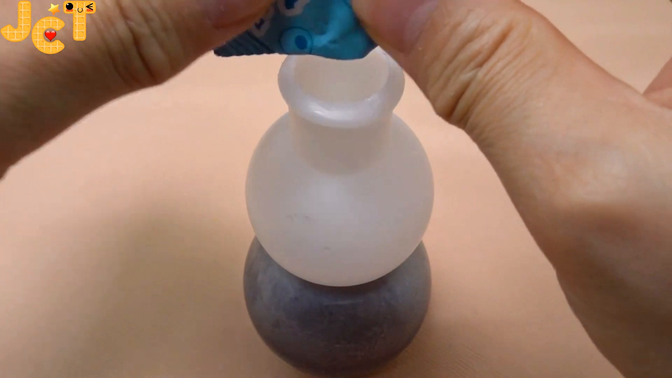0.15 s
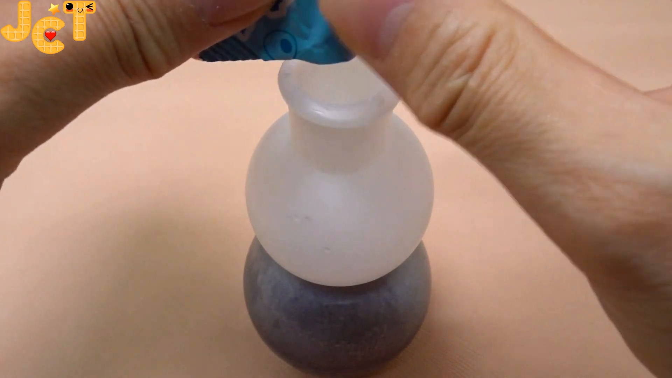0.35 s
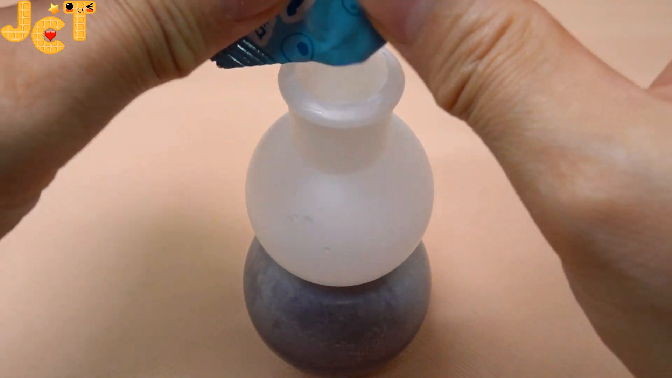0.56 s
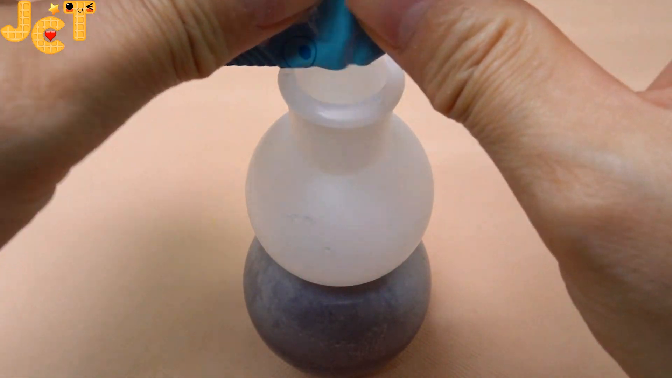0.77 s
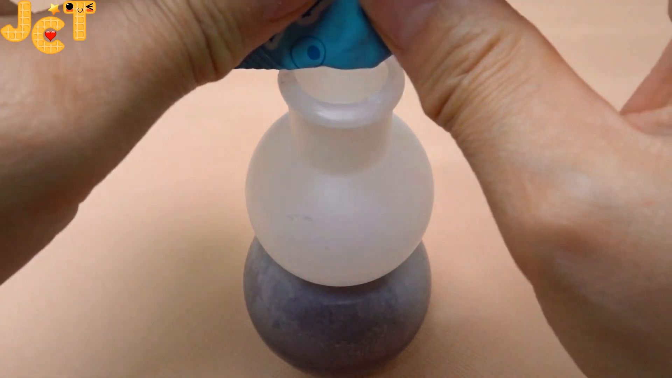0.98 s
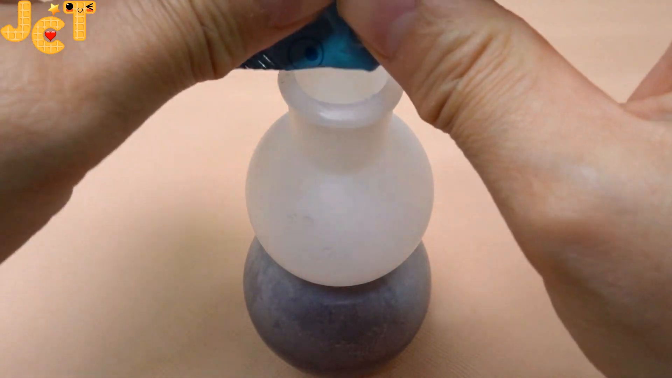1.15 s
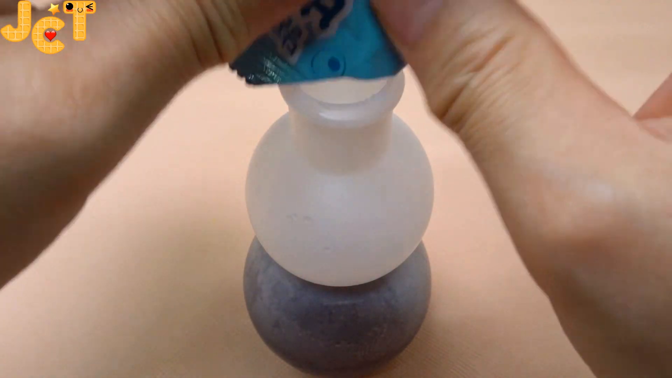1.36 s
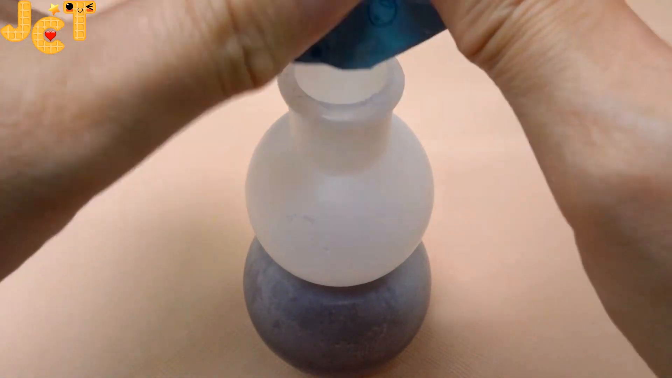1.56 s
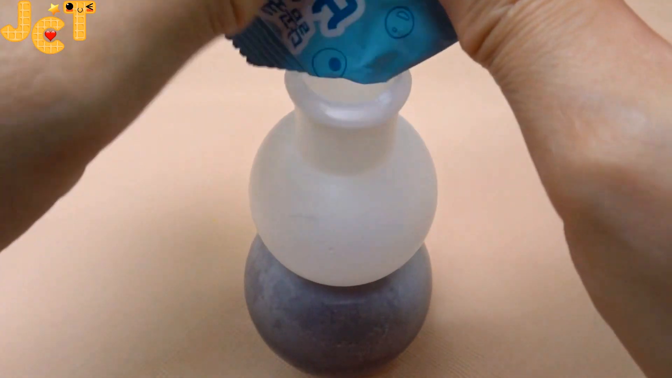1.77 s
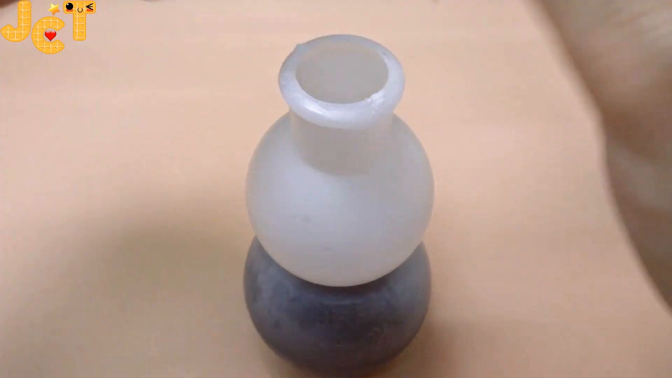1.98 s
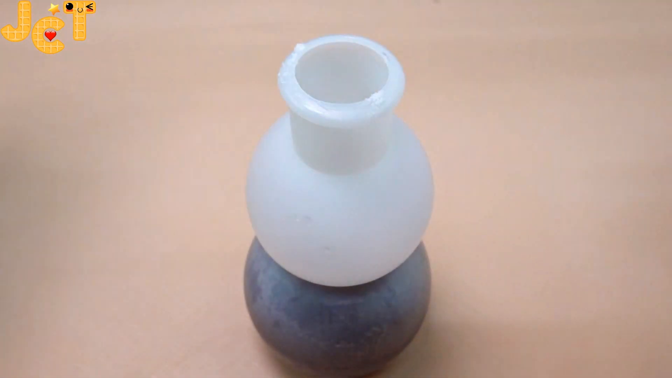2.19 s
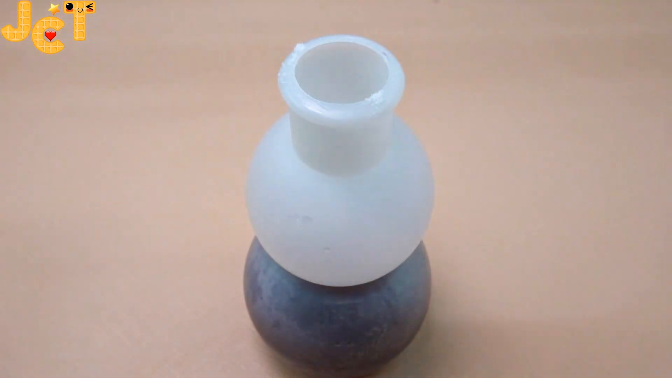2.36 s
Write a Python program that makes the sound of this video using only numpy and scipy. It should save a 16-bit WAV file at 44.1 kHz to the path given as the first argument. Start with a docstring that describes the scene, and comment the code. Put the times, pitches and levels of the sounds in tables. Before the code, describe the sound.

A plastic sachet crinkles in bright, irregular snaps over fine crackle, while small bursts of grains and dull bumps ring a little plastic flask; it thins to a few ticks. Close stereo microphone, quiet small room.

```python
"""Creases snap in the film of a plastic sachet, squeezed and shaken over a small plastic flask, over finer crackle.
Each snap is a sharp crack with a short scatter, coloured by a ringing patch of film; a few panels pop with a pitch.
Candy grains, clumps of powder and dull bumps strike the flask and ring its fading modes; fingers rub in dull pulses.
The sachet is lifted away, leaving a few last ticks. Filtered noise makes the still air and faint tail of the room."""
import sys
import numpy as np
from scipy import signal
from scipy.fft import rfft, irfft
from scipy.io import wavfile

SR = 44100
rng = np.random.default_rng(int(sys.argv[2]) if len(sys.argv) > 2 else 0)


def inscribe(sig):
    """Save sig as 16-bit PCM at rate SR to the path in sys.argv[1].

    A 1-D sig is mono; a 2-D sig holds one channel per row.
    Samples are clipped to [-1, 1] before scaling.
    """
    pcm = np.round(np.clip(np.atleast_2d(sig).T, -1, 1) * 32767)
    wavfile.write(sys.argv[1], SR, pcm.astype(np.int16))


N = 105840  # length of the scene [samples]
TOP_HZ = 16100  # upper limit of the sound
SNAP_WINDOW_S = .005  # the level of any short sound is taken over this time


def undb(db):
    """Turn decibels into gain."""
    return 10 ** (np.asarray(db) / 20)


def unit(x):
    """Scale to an energy of one per channel, averaged over the channels."""
    channels = len(np.atleast_2d(x))
    return x / np.sqrt(np.sum(x ** 2) / channels + 1e-20)


def steady(x):
    """Scale a sound that lasts the whole scene to an average strength (rms) of one."""
    return unit(x) * np.sqrt(N)


def blow(x, db):
    """Set the level of a short sound, taken over the length of a snap."""
    return undb(db) * unit(x) * np.sqrt(SNAP_WINDOW_S * SR)


def curve(points):
    """Gain over time, drawn as straight lines in dB between (time [s], level [dB]) points."""
    times, levels = np.array(points).T
    return undb(np.interp(np.arange(N) / SR, times, levels))


def freqs(size=1024):
    """Frequencies [Hz] in the spectrum of a short response."""
    return np.fft.rfftfreq(size, 1 / SR)


def slope(points, f):
    """Levels in dB at frequencies f, joined on a log frequency axis."""
    hz, db = np.array(points).T
    return np.interp(np.log(f + 1), np.log(hz), db)


def causal(db):
    """Response with this spectrum in dB that starts at once and is as short as possible."""
    cepstrum = irfft(np.log(undb(db)))
    half = len(cepstrum) // 2
    # folding the second half onto the first keeps everything after time zero
    cepstrum[1:half] *= 2
    cepstrum[half + 1:] = 0
    return irfft(np.exp(rfft(cepstrum)))


def through(x, h):
    """Pass a sound through a response, keeping its length."""
    full = signal.fftconvolve(np.atleast_2d(x), np.atleast_2d(h), axes=1)
    return full[:, :np.shape(x)[-1]]


def band(x, low_hz, high_hz, order=3):
    """Keep only the frequencies between two limits."""
    sos = signal.butter(order, [low_hz, high_hz], "band", fs=SR, output="sos")
    return signal.sosfilt(sos, x)


def add(out, start, x):
    """Mix x into out at a start time [s]."""
    i = max(int(start * SR), 0)
    out[:, i:i + x.shape[-1]] += x[..., :N - i]


WIDE_HZ, SIDE_SHARE, SIDE_BASS = 8000, .52, .12  # the side share grows from SIDE_BASS towards the treble


def widen(mid, side):
    """Two ears that are alike in the bass and differ in the treble."""
    f = freqs(len(mid))
    share = SIDE_BASS + SIDE_SHARE * f / np.hypot(f, WIDE_HZ)
    side = irfft(rfft(side) * share, len(mid))
    return mid + np.array([side, -side])


def stereo_noise(size):
    """Noise spread between the ears."""
    return widen(*rng.standard_normal((2, size)))


def grains(per_s, spread_db):
    """Impulses of uneven size and random sign at random times, rms one."""
    size = undb(spread_db * np.clip(rng.standard_normal(N), -2, 2)) * rng.choice([-1, 1], N)
    hit = rng.random(N) < per_s / SR
    return steady(size * hit)


# tone of the still air: (frequency [Hz], level [dB])
AIR = [(25, 7.5), (70, -6.5), (140, 4.5), (300, -0.5), (500, -4.5), (1200, -8), (3000, -7.5), (7700, -10.5),
       (16000, -16)]
AIR_DB = -62.5  # rms level


def still_air():
    """The quiet hiss and rumble of the air: steady noise shaped by its tone."""
    response = causal(slope(AIR, freqs(size=4096)))
    return undb(AIR_DB) * steady(through(stereo_noise(N), response))


ROOM_DB, ROOM_T60_S = -30, 0.76  # T60: time to fade by 60 dB


def room(size=32768):
    """Faint, dull tail of a small room: noise that swells briefly, then fades evenly in dB."""
    t = np.arange(size) / SR
    swell = np.clip(t / 0.031, 0, 1) ** 2
    tail = stereo_noise(size) * np.exp(-np.log(1000) * t / ROOM_T60_S) * swell
    return undb(ROOM_DB) * unit(band(tail, low_hz=120, high_hz=8200, order=1))


# dull rubbing of fingers on the sachet: (time [s], level [dB])
RUB = [(0, -54), (.2, -70), (.29, -50.5), (.37, -57), (.43, -72), (.54, -56), (.98, -70.5), (1.06, -56),
       (1.2, -67.5), (1.66, -58.5), (2.3, -68)]


def rubbing():
    """Fingertips stick and slip on the sachet: dull, uneven pulses."""
    slips = grains(per_s=320, spread_db=3)
    dull = band(slips, low_hz=128, high_hz=630) + band(slips, low_hz=51.3, high_hz=124)
    return curve(RUB) * steady(dull)


FLASK_DETUNE, FLASK_SPREAD_DB = .008, 3  # random spread of pitch (as a fraction) and level from blow to blow
# what the flask rings with, before that spread: (frequency [Hz], level [dB], time to fade by 60 dB [s])
FLASK = [(882, 0, .085), (955, -7, .035), (1560, -14, .025), (2680, -16, .025), (4230, -13, .02),
         (4960, -16, .02)]


def flask(size=4096):
    """Response of the flask to one blow: the air in its neck, and wall modes that depend on the spot hit."""
    t = np.arange(size) / SR
    hz, db, t60 = np.array(FLASK).T[:, :, None]
    detune, weight = rng.standard_normal((2, len(FLASK), 1))
    modes = np.sin(2 * np.pi * hz * (1 + FLASK_DETUNE * detune) * t) * np.exp(-np.log(1000) * t / t60)
    # dividing by sqrt(t60) keeps long-lived modes from gaining energy just by lasting
    gains = undb(db + FLASK_SPREAD_DB * weight) / np.sqrt(t60)
    return unit(band(np.sum(gains * modes, axis=0), low_hz=397, high_hz=12000))


GRAINS_PER_S = 400
# flow of grains into the flask: (time [s], level [dB])
POUR = [(0, -55), (.15, -72.5), (.33, -51.5), (.44, -80), (.58, -83), (1.1, -64), (1.48, -83),
        (1.55, -51.5), (1.66, -51), (1.74, -55.5), (1.81, -86), (1.98, -53.5), (2.15, -76)]
# clumps of powder landing in the flask: (time [s], level [dB])
CLUMPS = [(.5118, -35.5), (.555, -45), (1.541, -42), (1.642, -30), (1.653, -32.5), (1.688, -41.5),
          (2.042, -47), (2.1255, -51.5)]


def powder(spots=6):
    """Single grains land on several spots of the flask; now and then a clump drops at once."""
    out = np.zeros((1, N))
    for _ in range(spots):
        hits = curve(POUR) * grains(GRAINS_PER_S / spots, spread_db=2.5)
        out += through(hits, flask()) / np.sqrt(spots)
    for start, db in CLUMPS:
        add(out, start, blow(flask(), db))
    return out


REBOUND_S, REBOUND_DB = .0035, -9  # shortest delay of the rebound, and its level against the knock
BUMP_RING_DB = -8  # ring of the flask against the knock
# the sachet bumps the flask: (time [s], level [dB], lowest and highest frequency of the knock [Hz])
BUMPS = [(0.0603, -39.5, 246, 476), (0.0682, -47, 131, 920), (0.2196, -39, 137, 500),
         (.5088, -38.5, 307, 374), (.8605, -47, 610, 746), (1.6941, -36, 260, 566),
         (1.7738, -45.5, 440, 895), (2.0705, -45, 280, 600), (2.0755, -40, 660, 885),
         (2.089, -37.5, 213, 420)]


def bumps(size=2048):
    """Short, dull knocks with an uneven rebound; they also ring the flask."""
    out = np.zeros((1, N))
    for start, db, low_hz, high_hz in BUMPS:
        knock = band(signal.unit_impulse(size), low_hz, high_hz, order=2)
        add(out, start, blow(knock, db))
        add(out, start + REBOUND_S * rng.uniform(1, 2.025), blow(knock, db + REBOUND_DB))
        add(out, start, blow(flask(), db + BUMP_RING_DB))
    return out


CRACK_S, SCATTER_S, SCATTER_DB = 0.00014, 0.0038, -1  # fading times; scatter level against the crack


def click(size=1024):
    """A sharp crack, then its scatter through the film and between the hands."""
    t = np.arange(size) / SR
    spectrum = rfft(rng.standard_normal((2, size)) * np.exp(-t / CRACK_S))
    mid, side = irfft(spectrum / abs(spectrum) ** .8)  # evens out most of the spectrum
    # shift a few samples later, and silence the second half
    crack = np.roll(widen(mid, side), 8, axis=1) * (t < t[-1] / 2)
    scatter = stereo_noise(size) * np.exp(-t / SCATTER_S)
    return unit(unit(crack) + undb(SCATTER_DB) * unit(scatter))


RING_OCTAVES = .2  # distance from the ring's centre to half its height in dB
# basic tone of the film: (frequency [Hz], level [dB])
FILM = [(100, -25), (300, -15.5), (600, -20.5), (900, -4), (1200, -6.5), (1800, -2.5), (2600, 1.5),
        (4200, 4), (6000, 3), (9000, 3.5), (12000, 2.5), (16000, -3)]


def patch(hz, ring_db):
    """Spectrum in dB of a patch of film that rings at hz."""
    f = freqs()
    distance = np.log2((f + 1) / hz) / RING_OCTAVES
    return slope(FILM, f) + ring_db / (1 + distance ** 2)


RING_REF_HZ = 6500  # reference pitch for the ring and tilt of the film
FINE_RING_DB, FINE_CORNER_HZ = 1, 1320  # ring of the tiny snaps; their tilt starts above the corner
FINE_TILT_DB = -1.5  # per octave, for a patch at RING_REF_HZ; higher patches tilt brighter


def crackle(per_s, spread_db, count=12):
    """Tiny snaps from many patches of film, some dull and some bright, each patch with its own scatter."""
    out = 0
    octaves = np.log2(np.hypot(freqs(), FINE_CORNER_HZ) / RING_REF_HZ)
    for hz in np.geomspace(3000, 12000, count):
        tilt_db = FINE_TILT_DB + 2 * np.log2(hz / RING_REF_HZ)
        response = causal(patch(hz, FINE_RING_DB) + tilt_db * octaves)
        out = out + through(grains(per_s / count, spread_db), unit(through(click(), response)))
    return steady(out)


CRACKLES_PER_S, CRACKLE_SPREAD_DB = 650, 8
# fine crackle of the film under the fingers: (time [s], level [dB])
RUSTLE = [(0, -54.5), (.19, -57.5), (.24, -47.5), (.37, -40), (.44, -59.5), (.5, -42), (.58, -57),
          (.63, -43.5), (.69, -48.5), (.75, -33), (.81, -46.5), (.87, -40.5), (.92, -49), (1.03, -45),
          (1.08, -42.5), (1.16, -45.5), (1.38, -41.5), (1.44, -34.5), (1.48, -48.5), (1.62, -29),
          (1.68, -36.5), (1.75, -49), (1.82, -55.5), (1.87, -28.5), (1.9, -48), (1.96, -31.5),
          (2.02, -68.5), (2.08, -38.5), (2.11, -53), (2.22, -72)]


def rustle():
    """Fingers stir the film into a fine crackle that swells and sinks."""
    return curve(RUSTLE) * crackle(CRACKLES_PER_S, CRACKLE_SPREAD_DB)


# quick runs of tiny buckles: (start time [s], length [s], level [dB])
CRUMPLES = [(0.273, 0.0063, -30), (0.365, 0.0054, -44), (0.616, 0.0045, -29.5), (0.762, 0.0041, -22.5),
            (0.837, 0.0065, -31.5), (1.283, 0.0092, -32), (1.334, 0.003, -43), (1.349, 0.004, -36),
            (1.423, 0.04, -38), (1.536, 0.014, -33.5), (1.64, 0.0096, -29), (1.974, 0.0049, -41)]


def crumples():
    """The film gives way in short, dense runs that start quickly and fade over a few milliseconds."""
    t, gate = np.arange(N) / SR, np.zeros(N)
    for start, length, db in CRUMPLES:
        rise = np.clip((t - start) / 0.00069, 0, 1)
        fade = np.exp(-np.maximum(t - start - length, 0) / 0.003)
        gate += undb(db) * rise * fade
    return gate * crackle(per_s=4000, spread_db=5)


POP_CYCLES = 1.65  # cycles until the swing of a pop is widest
# a whole panel of the sachet flips with a pitched pop: (time [s], level [dB], pitch [Hz])
POPS = [(.5112, -29, 3960), (.5338, -25, 2550), (.888, -29.5, 2630)]


def pops(size=512):
    """A panel of film flips over and swings for a few cycles."""
    out = np.zeros((2, N))
    for start, db, hz in POPS:
        cycles = hz * np.arange(size) / SR
        swing = np.sin(2 * np.pi * cycles) * cycles * np.exp(-cycles / POP_CYCLES)
        add(out, start, blow(swing, db))
    return out


LEAD_S, LEAD_DB, LEAD_TICKS_PER_S = 0.0012, -15.5, 1200  # growth time, level before the snap is coloured, rate


def lead_in(size=512):
    """Faint noise with sparse ticks, swelling briefly before a snap."""
    ticks = rng.standard_normal((2, size)) * (0.1 + (rng.random(size) < LEAD_TICKS_PER_S / SR))
    growth = np.exp(-np.arange(size)[::-1] / SR / LEAD_S)
    return undb(LEAD_DB) * unit(widen(*ticks * growth))


CREASE_RIPPLE_DB, RIPPLE_OCTAVES, RIPPLE_FROM_HZ = 4, .22, 800  # typical height, spacing, lowest frequency


def ripple():
    """Chance peaks and dips in dB: every fold has a shape of its own."""
    knots = 2 ** np.arange(np.log2(RIPPLE_FROM_HZ), np.log2(TOP_HZ), RIPPLE_OCTAVES)
    heights = CREASE_RIPPLE_DB * rng.standard_normal(len(knots))
    return slope(list(zip(knots, heights)), freqs())


SNAP_DB, PAN_DB = -3, 1.2  # trim of all snaps; how much louder the first channel is than the second
RING_DB, RING_GROWTH = 7.5, 0.6  # ring at RING_REF_HZ; larger, lower patches ring more strongly
# creases snapping, levels before the SNAP_DB trim: (time [s], level [dB],
# body against that level [dB], treble against that level [dB], ring of the film [Hz])
CREASES = [(0.0224, -38.5, -4.5, 7.5, 5900), (0.0706, -37.5, -4, 7, 7700), (0.1149, -52, 12.5, 11, 10000),
           (0.1255, -36.5, -39, 2.5, 6700), (0.1754, -33.5, -5.5, -2, 5340), (0.208, -36, -4, 5.5, 10800),
           (0.2204, -40.5, 3, 6, 4000), (0.2784, -36.5, 0.5, 0, 13500), (0.322, -29, -7, 0.5, 9550),
           (0.3451, -26.5, -9, 1, 4660), (0.3762, -41.5, 7, 12, 6250), (0.3888, -25.5, -20, -7.5, 6650),
           (0.434, -31, -12, -6, 4970), (0.4516, -34.5, -9.5, 7.5, 6000), (0.4692, -34.5, -17, 7.5, 6900),
           (0.478, -38.5, -6, 9, 9800), (0.4841, -34, -19, 5, 9200), (0.4983, -27.5, -45, 4.5, 8150),
           (0.5043, -40, 6, 13, 8300), (0.5114, -23.5, -8, -6, 7440), (0.534, -23, -11, -1.5, 7500),
           (0.5452, -30, -6, 3, 3580), (0.5547, -38, -2, 7.5, 7950), (0.6002, -38, 1, 9, 10200),
           (0.6085, -29, -13, -3, 3740), (0.6195, -40.5, 0, 21, 11300), (0.7158, -28, -6, -1, 7900),
           (0.7194, -23.5, -7.5, -2.5, 4600), (0.766, -38, -6, -13, 3370), (0.77, -26, -10, 0, 10900),
           (0.796, -34, -2, -1, 3760), (0.8621, -22, -8, -0.5, 6730), (0.8877, -30.5, 1.5, 6, 5700),
           (0.8931, -25.5, -17, -20, 3960), (0.937, -34, -13, 14, 9250), (0.9577, -21.5, -19.5, -4, 8700),
           (1.0046, -26, -9.5, -4, 8840), (1.0128, -29, -10.5, -10, 2960), (1.0676, -29.5, -9.5, 4, 13800),
           (1.0913, -26, -9, 3.5, 8800), (1.0991, -29.5, -7, 11, 10600), (1.106, -27, -23, -14, 5660),
           (1.114, -42.5, -45, 24, 12400), (1.1342, -26.5, -12, -2.5, 12400), (1.1742, -30, -13, 0, 8000),
           (1.1908, -29.5, -15, -6, 4540), (1.1947, -32, -4.5, -2, 3650), (1.254, -28.5, -11.5, -6, 5440),
           (1.2913, -43, -13, 17, 7400), (1.304, -30.5, -19, 1.5, 9200), (1.3653, -33.5, -10, -5, 6600),
           (1.4105, -31, 0, 4, 9500), (1.4146, -25, -24, -5, 5770), (1.4276, -27.5, -41, 4.5, 7400),
           (1.4476, -29.5, -6.5, 4.5, 10000), (1.4518, -29, -13, 1.5, 9600), (1.522, -27, -11, 0, 9500),
           (1.5493, -22, -16, -6, 4070), (1.569, -29.5, -29, 8, 9100), (1.6019, -27, -24, 6, 12500),
           (1.605, -25, -17, -16, 6500), (1.6344, -21.5, -12.5, -2, 5950), (1.638, -27.5, -4, 8.5, 2680),
           (1.6561, -21, -40, -2.5, 4330), (1.6855, -31.5, -41, 9.5, 8700), (1.6962, -31, -7, 3, 4040),
           (1.7174, -26, -22, -13, 6600), (1.7307, -35.5, -6.5, 8, 11700), (1.7588, -37, -16, -9, 6000),
           (1.7749, -26.5, -5.5, -1, 4640), (1.8397, -28.5, -2.5, 6, 10000),
           (1.8655, -29.5, -14, 9.5, 10800), (1.8739, -30, -22, 2, 9150), (1.9082, -37.5, -7, 10, 10400),
           (1.9212, -40, -9, -4, 4500), (1.9293, -27, -12, 0.5, 4850), (1.9534, -26.5, -5, 0.5, 2970),
           (1.9554, -30, -5.5, 4.5, 3150), (1.9948, -31.5, -11, -2.5, 5470), (2.006, -36.5, -4.5, -6, 4300),
           (2.0658, -35.5, -6, -32, 3830), (2.08, -36, 0.5, 2.5, 3930), (2.1766, -44.5, -11, -8.5, 5270),
           (2.3018, -40.5, -16, -4.5, 8400)]


def creases():
    """Each crease snaps after a brief faint swell of noise, with its own body, treble and ringing patch of film."""
    out, f = np.zeros((2, N)), freqs()
    edges, centres = [900, 2500, 7000, 16000], [1500, 4200, 10500]  # body, middle and treble [Hz]
    pan = undb(np.array([[1], [-1]]) * PAN_DB / 2)
    for start, db, body_db, treble_db, hz in CREASES:
        lead, snap = lead_in(), click()
        ring_db = RING_DB * (RING_REF_HZ / hz) ** RING_GROWTH
        colour = patch(hz, ring_db) + ripple()
        # find the level the coloured snap has in each band, then correct it towards the table
        power = np.mean(abs(rfft(snap)) ** 2, axis=0) * undb(colour) ** 2 / len(f)
        band_power = np.histogram(f, edges, weights=power)[0]
        band_db = 10 * np.log10(band_power / (SNAP_WINDOW_S * SR))
        weights = db + np.array([body_db, 0, treble_db]) - band_db
        response = causal(colour + slope(list(zip(centres, weights)), f))
        # begin early, so that the snap itself falls on its time
        add(out, start - lead.shape[1] / SR, pan * through(np.hstack([lead, snap]), response))
    return out * undb(SNAP_DB)


FLASK_DB = -29.5  # share of the crinkling that rings the flask
WALL_LAG_S = 0.00203  # delay of a sideways reflection


def scene():
    """Film, fingers, grains and knocks over the flask, with the room and its still air."""
    film = creases() + pops() + crumples() + rustle()
    crinkle_in_flask = undb(FLASK_DB) * through(film.mean(axis=0), flask())
    body = (bumps() + rubbing() + powder() + crinkle_in_flask).mean(axis=0)
    reflection = np.roll(body, int(WALL_LAG_S * SR))
    near = film + widen(body, reflection)
    return near + through(near, room()) + still_air()


def record(dry):
    """The recorder thins the deep bass and cuts the top."""
    thin = signal.sosfilt(signal.butter(1, 55, "high", fs=SR, output="sos"), dry)
    return signal.sosfilt(signal.ellip(10, .2, 80, TOP_HZ, fs=SR, output="sos"), thin)


dry = scene()
out = record(dry)
inscribe(out)
```